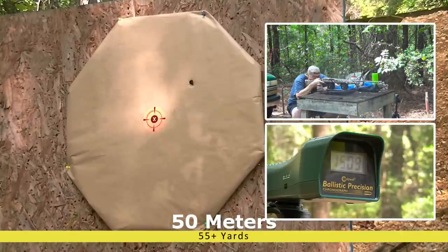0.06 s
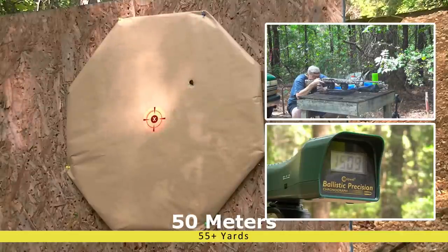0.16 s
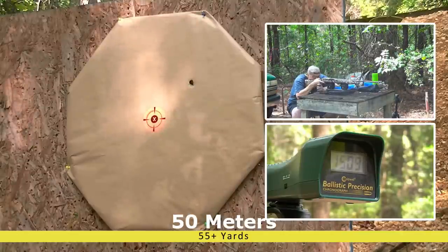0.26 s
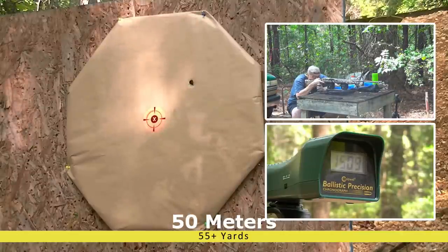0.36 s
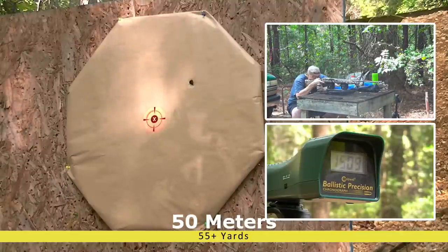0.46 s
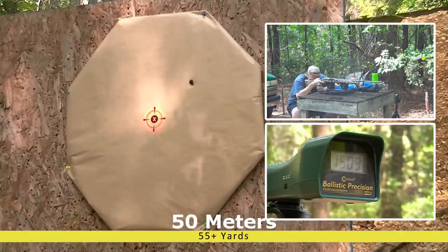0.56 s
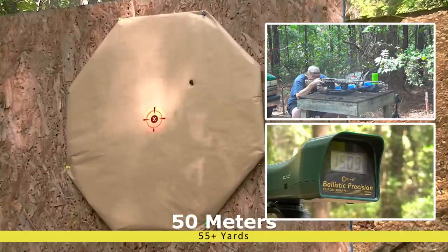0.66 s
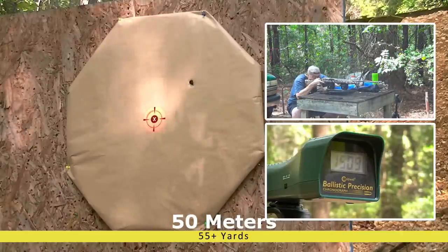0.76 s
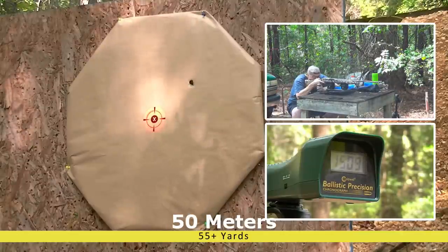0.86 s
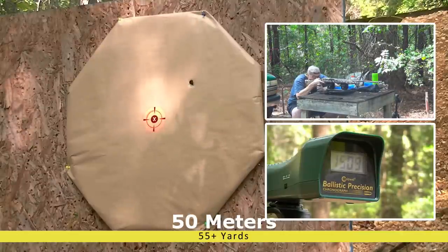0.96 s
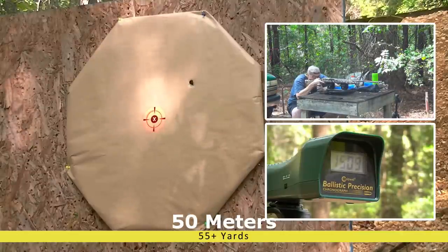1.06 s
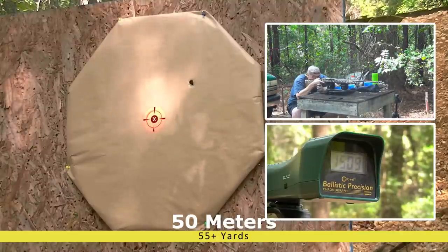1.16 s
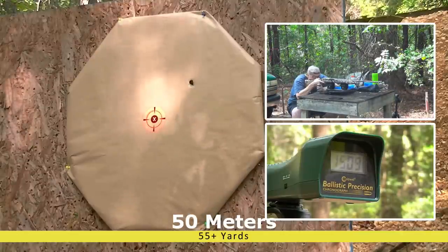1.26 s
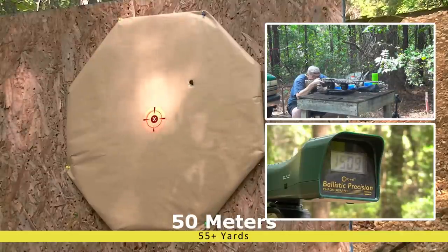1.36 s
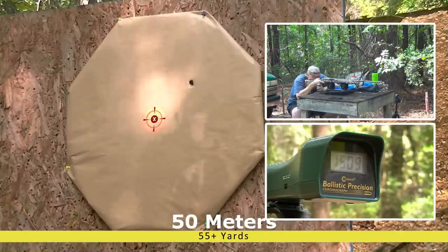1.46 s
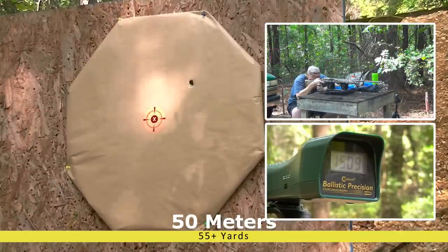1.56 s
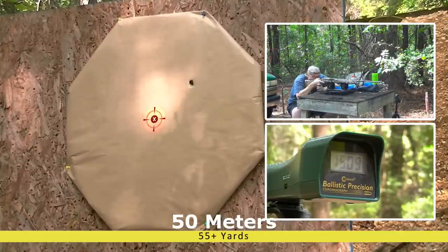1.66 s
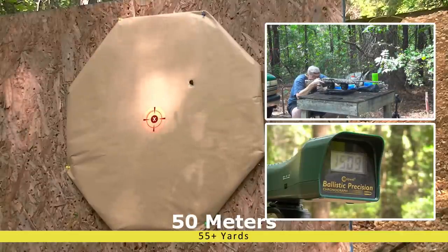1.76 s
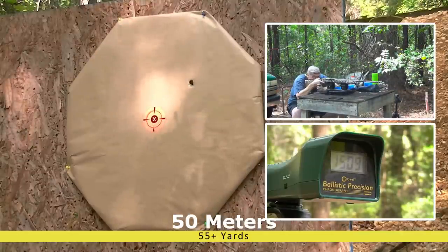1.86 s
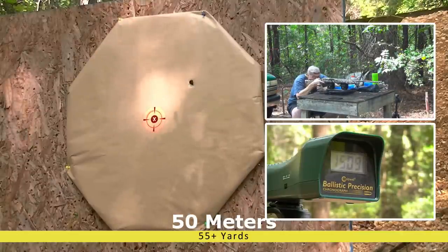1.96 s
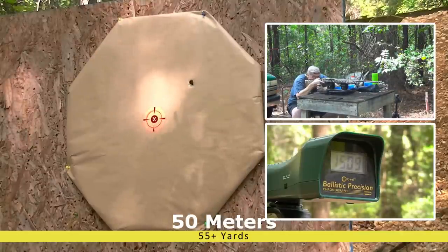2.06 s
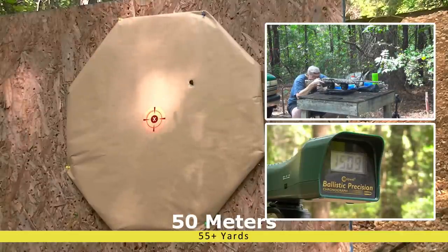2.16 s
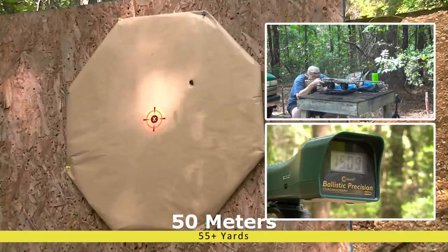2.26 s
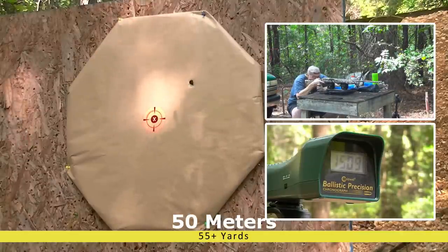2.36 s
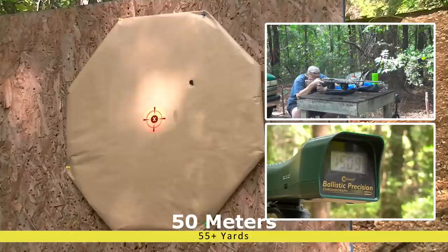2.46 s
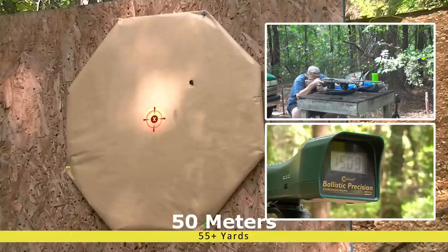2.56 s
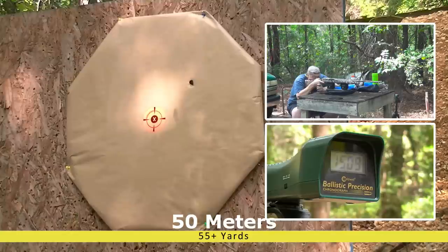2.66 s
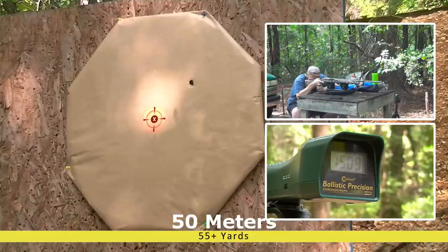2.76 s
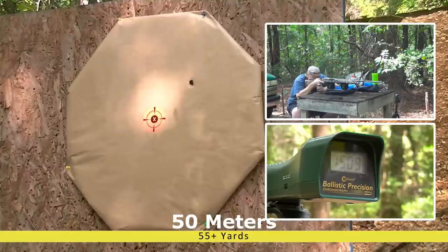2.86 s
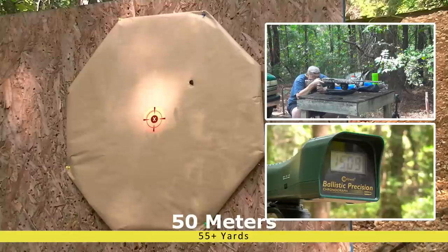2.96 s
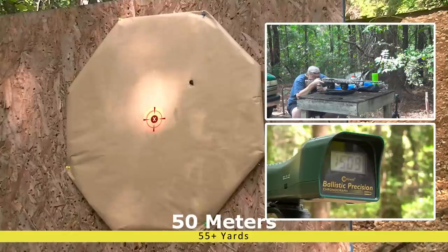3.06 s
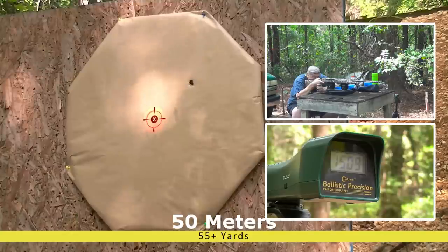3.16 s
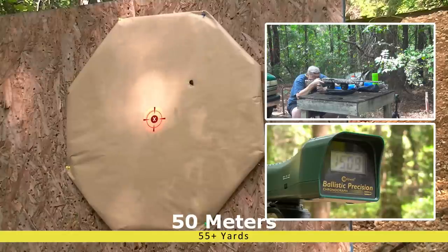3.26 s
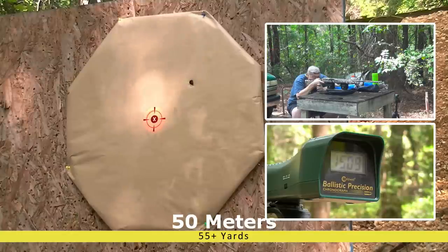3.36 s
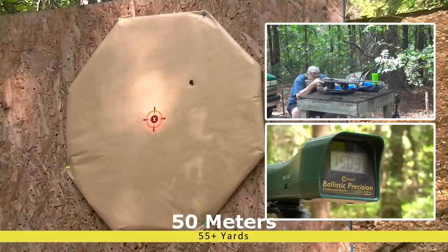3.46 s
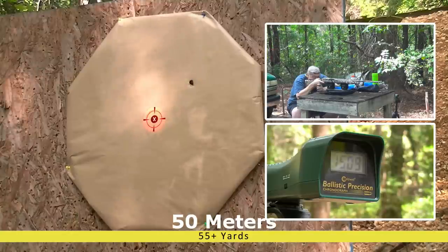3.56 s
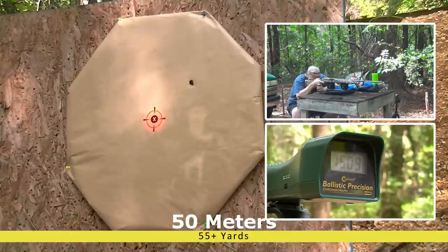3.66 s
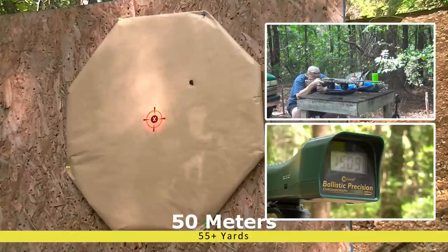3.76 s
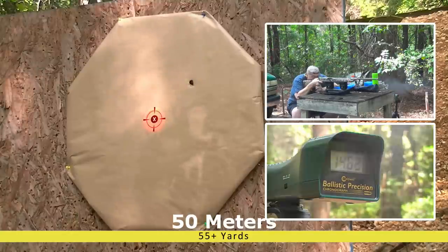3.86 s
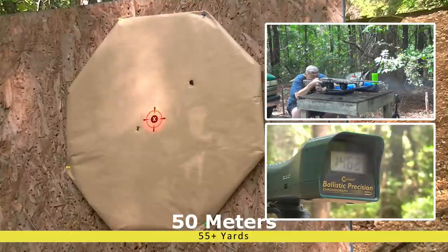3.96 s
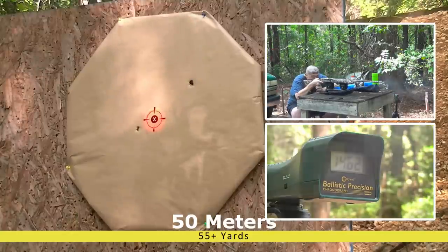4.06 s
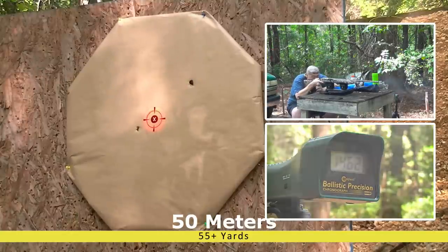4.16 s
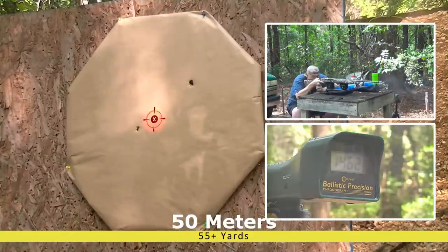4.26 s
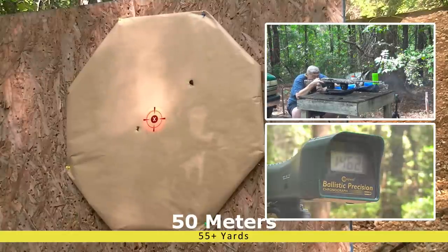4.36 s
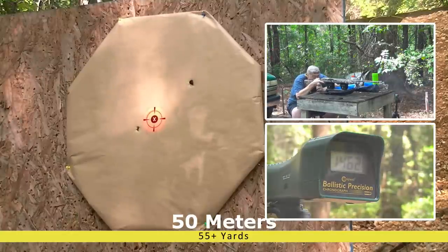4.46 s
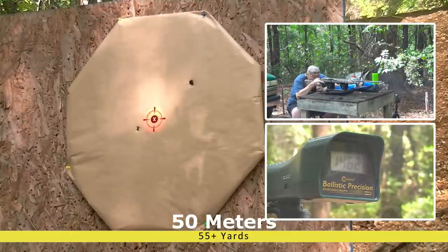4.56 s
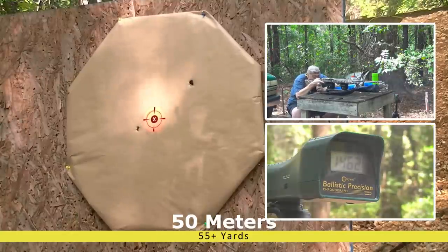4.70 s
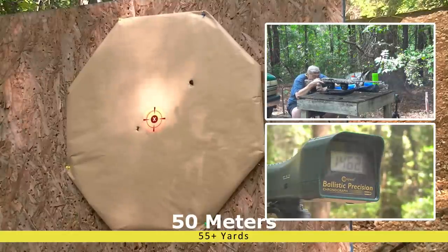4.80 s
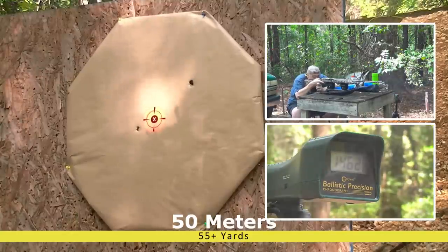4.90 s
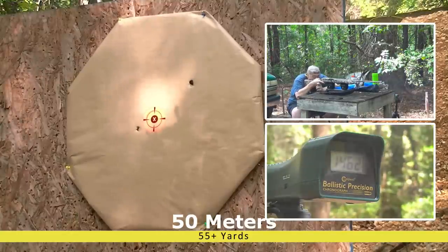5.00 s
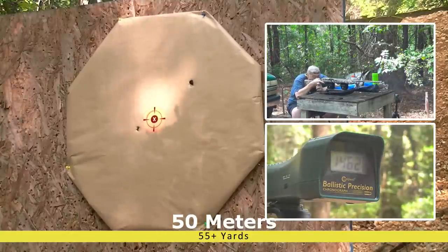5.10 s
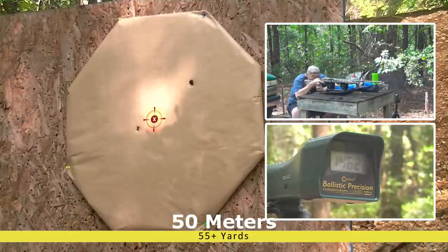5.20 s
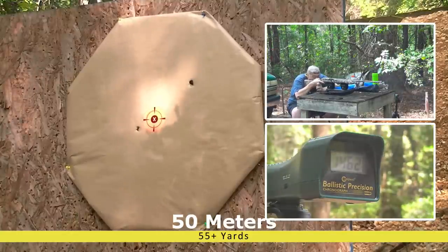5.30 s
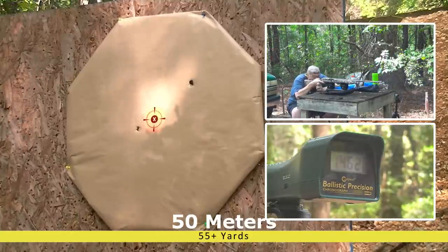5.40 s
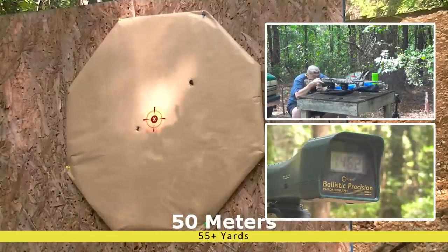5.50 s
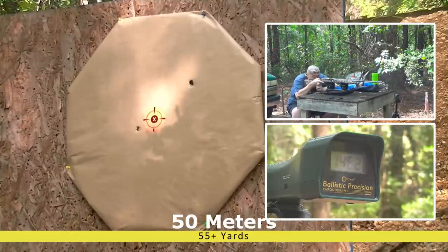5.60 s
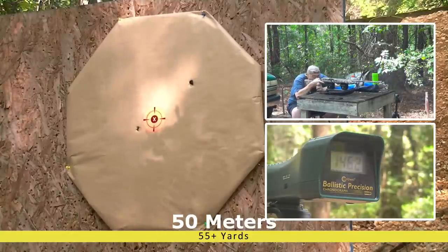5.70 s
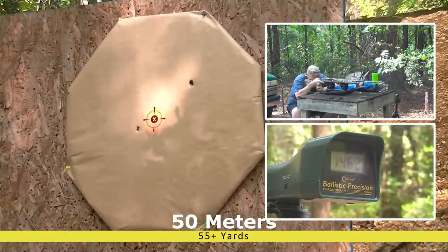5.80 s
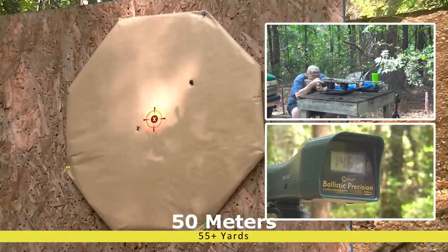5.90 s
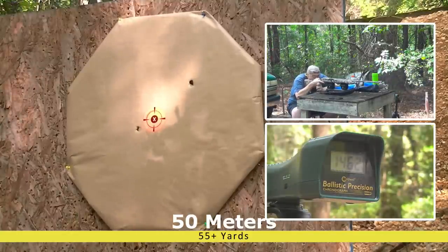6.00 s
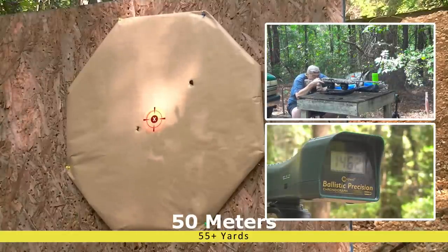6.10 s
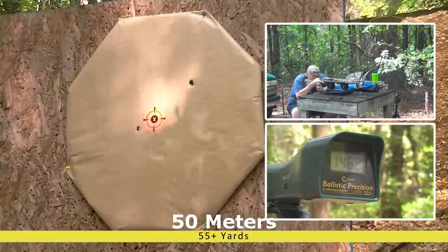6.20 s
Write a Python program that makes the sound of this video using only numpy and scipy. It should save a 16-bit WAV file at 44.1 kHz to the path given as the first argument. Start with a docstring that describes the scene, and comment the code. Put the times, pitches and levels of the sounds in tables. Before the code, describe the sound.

A single loud shotgun blast rolls away through the woods, after faint clothing rustles over a quiet outdoor hush.

```python
"""Clothes rustle and gear ticks over a quiet hush of leaves, traffic and a far engine at a woodland range.
Then a shotgun fires from a bench a few metres away: the action snaps, gas bursts from the muzzle, and the
shock reflects off the ground. Near trunks scatter the blast as a crackle, far ones as a darkening roll.
The blast overloads the microphone; a limiter holds the first half second of the roar level, and a slow
gain control leaves the background ducked."""
import sys
import numpy as np
from scipy import signal
from scipy.fft import rfft, irfft
from scipy.io import wavfile
from scipy.ndimage import uniform_filter1d

SR = 44100
rng = np.random.default_rng(int(sys.argv[2]) if len(sys.argv) > 2 else 0)


def master(y):
    """Save y as 16-bit WAV."""
    cut = np.clip(np.atleast_2d(y).T, -1, 1)
    pcm = np.round(cut * 32767)  # scale
    wavfile.write(sys.argv[1], SR, pcm.astype(np.int16))


N = 275184
T = np.arange(N) / SR
SNAP_S, BLAST_S = 3.8516, 3.8578
BLAST_AGE_S = np.maximum(T - BLAST_S, 0)

# Relative spectral densities of the blast, its near echoes and its far echoes: frequency_hz, level_db
BLAST_SPECTRUM = [(40, -26.5), (150, -10.5), (400, 3.5), (900, -2.5), (1600, 1.5), (3000, -2), (4500, -6.5),
                  (7000, -4), (9500, 0.5), (12500, -3.5), (16000, -11)]
NEAR_SPECTRUM = [(24, -57.5), (40, -27), (174, -4.5), (333, -4.5), (387, -9), (637, -6), (722, -10.5),
                 (881, -4), (1100, -1.5), (1910, -6), (2160, -5.5), (2570, -9.5), (11200, -19),
                 (15500, -33.5)]
WOODS_SPECTRUM = [(35, -54), (60, -29.5), (151, -23), (195, -21), (309, -16), (469, -7.5), (605, -3.5),
                  (648, -4.5), (711, -1.5), (1080, 0), (1670, -7.5), (3840, -14.5), (7000, -29),
                  (9900, -31), (15000, -50.5)]
# Extra loss to air and foliage along the path, negative for a gain: frequency_hz, loss_db_per_s
PATH_LOSS = [(100, 4.5), (300, -4.5), (700, -2), (1200, 1), (2000, 4.5), (3500, 18.5), (6000, 32),
             (9000, 49), (14000, 70.5)]
# Dense stands of trees that reflect more than the rest: arrival_s, half_width_s, boost_db
TREE_STANDS = [(4.04, 0.042, 2), (4.28, 0.054, 4.5), (4.86, .03, 2)]
# Level difference for sound from the right, mainly in the midrange: frequency_hz, left_minus_right_db
RIGHT_LEAN = [(100, 0), (350, -1), (850, -4), (1700, -4.5), (3000, -1), (4300, -2), (8000, -.4), (13000, 0)]
# Strokes of cloth: middle_s, half_length_s, level_db, tilt_db_per_octave
CLOTH_STROKES = [(0.401, .07, -52.5, 0.5), (.555, 0.035, -59, -0.5), (0.874, 0.063, -52.5, 0),
                 (0.939, 0.1, -51.5, -2), (1.02, 0.11, -54.5, -3), (2.499, 0.12, -52.5, -2),
                 (2.565, 0.052, -55, -1.5), (2.865, .07, -51.5, 0), (2.913, 0.09, -48, -0.5),
                 (5.153, .11, -51.5, 3), (5.23, .09, -52.5, 7), (5.368, 0.13, -54, 5),
                 (5.489, 0.14, -55, 5), (5.718, 0.23, -64, 13), (6.167, 0.2, -59, 3)]
# Relative spectral density of sliding cloth: frequency_hz, level_db
CLOTH_SPECTRUM = [(300, -11), (1000, -1.5), (2400, 1.5), (3800, -4), (5000, -4.5), (7000, -4.5),
                  (10500, -4.5), (13000, -6.5), (16000, -29)]
# Ticks and knocks of gun and gear: start_s, level_db, centre_hz, half_width_octaves, t60_s
GEAR_CONTACTS = [(.4, -41.5, 900, 0.81, .017), (.555, -51, 1680, .4, .054), (.945, -44.5, 2200, .6, .027),
                 (1.023, -43, 800, .8, 0.014), (1.2257, -44, 11000, .3, .006), (1.232, -44, 350, .5, .023),
                 (1.2836, -45, 10000, .5, .004), (1.3762, -49, 6500, .25, .007),
                 (2.6255, -47, 9000, .9, .008), (2.865, -46.5, 1100, .18, .057),
                 (2.918, -45, 2400, .3, .06), (2.948, -42, 2200, 0.6, .012),
                 (3.0338, -44, 6500, 0.36, .008), (3.1278, -43.5, 7000, 0.76, .006),
                 (4.4614, -31.5, 14000, 0.27, .04), (4.9366, -33, 13500, .6, 0.056),
                 (5.4758, -40, 6500, .7, .011), (5.6862, -36, 12450, 0.4, 0.0059),
                 (6.174, -45, 13000, .4, .006), (6.213, -47, 7000, .9, .03)]
# Relative spectral density of leaves and distant traffic: frequency_hz, level_db
HUSH_SPECTRUM = [(15, -37), (25, -20.5), (48, -4.5), (126, -7.5), (267, -9.5), (368, -8.5), (399, -8),
                 (469, -6.5), (552, -8.5), (598, -8), (848, -10), (1270, -14), (3720, -17.5), (9810, -25.5),
                 (15500, -28.5)]
# Partials of a far engine: pitch_hz, level_db, swell_db
ENGINE_PARTIALS = [(57.4, -65, 1), (86, -74, 4), (122, -70, 9)]
# Likeness of the two microphone signals, for the echoes and for the other noises.
# Two lists each: frequency_hz, coherence; frequency_hz, left_lead_rad
ECHO_PAIR = ([(100, .98), (350, .92), (800, .7), (1500, .48), (2400, .35), (3200, .68), (7000, .58),
             (10000, .92), (12500, .995)], [(100, .2), (400, .42), (800, .55), (1500, .6), (2400, 0),
             (3200, -.25), (6000, 0), (13000, 0)])
PLAIN_PAIR = ([(100, .98), (500, .88), (1300, .7), (5000, .77), (9000, .9), (12500, .995)], [(100, .05),
              (1000, .22), (3000, .05), (13000, 0)])


def muzzle_blast(snap_db=-12, jet_db=4.5, jet_hold_s=0.0048, jet_t60_s=0.0099):
    """Turbulent expansion: just after the action snaps, gas tears out for a few milliseconds."""
    noise = stereo_noise(lambda hz: curve_at(BLAST_SPECTRUM, hz), PLAIN_PAIR)
    snap = burst(SNAP_S, rise_s=0.0003, t60_s=0.01)
    jet = (T > BLAST_S) * decay(np.maximum(BLAST_AGE_S - jet_hold_s, 0), jet_t60_s)
    return noise * (gain_of(snap_db) * snap + gain_of(jet_db) * jet)


def ground_shock(delay_s=0.0077, overpressure_s=0.00065):
    """Reflection: the shock returns from the ground as a blast wave, overpressure and then suction."""
    scaled_age = np.maximum(BLAST_AGE_S - delay_s, 0) / overpressure_s
    pressure = (scaled_age > 0) * (1 - scaled_age) * np.exp(-scaled_age)
    return highpass(pressure, cutoff_hz=160, order=2)  # the microphone sheds deep bass


def near_echoes(level_db=2):
    """Scattering: bench, ground and the nearest trunks return the blast as a bright, full crackle."""
    grain = flutter(depth_db=4, samples=12) * flutter(depth_db=1, samples=300)
    crackle = stereo_noise(lambda hz: curve_at(NEAR_SPECTRUM, hz), ECHO_PAIR, grain=grain)
    return gain_of(level_db) * crackle * burst(BLAST_S, rise_s=0.0029, t60_s=0.84)


def woods_echoes(build_s=0.071, reference_s=4.26):
    """Absorption: the later an echo from the far trunks, the more treble its path has cost it."""
    grain = flutter(depth_db=2, samples=20) * flutter(depth_db=0.52, samples=700)
    roar = stereo_noise(lambda hz: curve_at(WOODS_SPECTRUM, hz), ECHO_PAIR, grain=grain)
    hz, frame_s, spectra = signal.stft(roar, SR, nperseg=512)
    extra_path_s = np.maximum(frame_s, BLAST_S) - reference_s  # zero where WOODS_SPECTRUM holds as is
    loss_db = curve_at(PATH_LOSS, hz)[:, None] * extra_path_s
    echoes = signal.istft(spectra * gain_of(-loss_db), SR, nperseg=512)[1][:, :N]
    return echoes * roll_envelope() * np.minimum(BLAST_AGE_S / build_s, 1)


def roll_envelope(level_db=-6, hold_s=0.55, fall_db_per_decade=61.5):
    """Power-law decay: the roll holds across the nearer trees, then falls; each dense stand lifts it."""
    fall_db = fall_db_per_decade * np.log10(1 + (BLAST_AGE_S / hold_s) ** 6) / 6
    stands_db = sum(boost_db * swell(arrival_s, width_s) for arrival_s, width_s, boost_db in TREE_STANDS)
    return gain_of(level_db - fall_db + stands_db)


def lean_right(echoes, early_share=1.9, late_share=0.12, build_s=0.015, fade_s=0.48):
    """Diffusion: early echoes come from the right, later ones from all round."""
    hz, frame_s, spectra = signal.stft(echoes, SR, nperseg=512)
    age_s = np.maximum(frame_s - BLAST_S, 0)
    share = late_share + early_share * (1 - np.exp(-age_s / build_s)) * np.exp(-age_s / fade_s)
    side_db = curve_at(RIGHT_LEAN, hz)[:, None] * share
    return signal.istft(spectra * gain_of([side_db / 2, -side_db / 2]), SR, nperseg=512)[1][:, :N]


def cloth_rustles():
    """Friction: cloth slides in short strokes, each a swell of tiny catches."""
    out = np.zeros((2, N))
    for middle_s, half_length_s, level_db, tilt in CLOTH_STROKES:
        count = round(2 * half_length_s * SR)
        catches = flutter(depth_db=3.5, samples=30, count=count)
        stroke = stereo_noise(lambda hz: curve_at(CLOTH_SPECTRUM, hz) + tilt * np.log2(hz + 1),
                              PLAIN_PAIR, count, catches)
        mix_in(out, middle_s - half_length_s, gain_of(level_db) * stroke * np.hanning(count) ** 2)
    return out


def gear_ticks(count=4096):
    """Damped resonance: each small hard contact rings briefly in one broad band."""
    out = np.zeros((2, N))
    age_s = np.arange(count) / SR
    for start_s, level_db, centre_hz, octaves, t60_s in GEAR_CONTACTS:
        ring = stereo_noise(lambda hz: -20 * np.log10(1 + (np.log2((hz + 1) / centre_hz) / octaves) ** 2),
                            PLAIN_PAIR, count)
        mix_in(out, start_s, gain_of(level_db) * ring * decay(age_s, t60_s))
    return out


def outdoor_hush(level_db=-53):
    """Incoherent addition: leaves and distant traffic merge into a nearly steady noise."""
    hush = stereo_noise(lambda hz: curve_at(HUSH_SPECTRUM, hz), PLAIN_PAIR)
    return gain_of(level_db) * hush * flutter(depth_db=0.54, samples=8000)


def far_engine():
    """Periodic vibration: low partials waver with the engine's speed and swell once before the shot."""
    out = np.zeros(N)
    speed = flutter(depth_db=0.16, samples=2500)
    run_s = np.cumsum(speed) / SR
    surge = swell(middle_s=3.25, half_width_s=0.46)
    for pitch_hz, level_db, swell_db in ENGINE_PARTIALS:
        partial = np.sin(2 * np.pi * pitch_hz * run_s) * flutter(depth_db=2.5, samples=2500)
        out += gain_of(level_db + swell_db * surge) * unit_rms(partial)
    return out


def stereo_noise(spectrum_db, pair, count=N, grain=1):
    """Partial coherence: two microphones share part of a coloured noise, scaled to rms 1."""
    hz = np.fft.rfftfreq(count, 1 / SR)
    common, separate = rfft(rng.standard_normal((2, count)) * grain)
    coherence, lead_rad = (curve_at(table, hz) for table in pair)
    left = common * np.exp(1j * lead_rad)
    right = coherence * common + np.sqrt(1 - coherence ** 2) * separate
    return unit_rms(irfft(np.array([left, right]) * gain_of(spectrum_db(hz)), count))


def flutter(depth_db, samples, count=N):
    """Random modulation: a gain that drifts over about the given number of samples."""
    return gain_of(depth_db * unit_rms(uniform_filter1d(rng.standard_normal(count), samples)))


def burst(start_s, rise_s, t60_s):
    """Transient envelope: a quick rise, then exponential decay."""
    age_s = np.maximum(T - start_s, 0)
    return (1 - np.exp(-age_s / rise_s)) * decay(age_s, t60_s)


def decay(age_s, t60_s):
    """Exponential damping: 60 dB down after t60_s."""
    return np.exp(-np.log(1000) * age_s / t60_s)


def swell(middle_s, half_width_s):
    """Bell curve of height 1."""
    return np.exp(-((T - middle_s) / half_width_s) ** 2)


def gain_of(db):
    """Decibels as an amplitude ratio."""
    return 10 ** (np.asarray(db) / 20)


def unit_rms(x):
    """Normalisation to rms 1."""
    return x / np.sqrt(np.mean(x ** 2) + 1e-20)


def curve_at(table, hz):
    """Interpolation on a log-frequency axis."""
    table_hz, values = np.transpose(table)
    return np.interp(np.log(hz + 1), np.log(table_hz + 1), values)


def mix_in(mix, start_s, sound):
    """Superposition of a stereo sound from start_s on."""
    part = mix[:, round(start_s * SR):][:, :sound.shape[1]]
    part += sound[:, :part.shape[1]]


def highpass(x, cutoff_hz, order):
    """Bass roll-off of 6 dB per octave for each order."""
    return signal.sosfilt(signal.butter(order, cutoff_hz, "highpass", fs=SR, output="sos"), x)


def smooth(x, lag_s):
    """Exponential averaging by a one-pole lag."""
    pole = np.exp(-1 / (lag_s * SR))
    return signal.lfilter([1 - pole], [1, -pole], x)


def peak_hold(db, release_db_per_s):
    """Peak detection: follows each rise at once and lets go at a steady rate."""
    return np.maximum.accumulate(db + release_db_per_s * T) - release_db_per_s * T


def scene():
    """Superposition: the shot and its echoes over the small sounds of the quiet range."""
    shot = muzzle_blast() + ground_shock()
    echoes = lean_right(near_echoes() + woods_echoes())
    background = outdoor_hush() + far_engine()
    return shot + echoes + cloth_rustles() + gear_ticks() + background


def record(dry, limit_db=-14, max_duck_db=9, ceiling=0.52, low_cut_hz=45, high_cut_hz=15900):
    """Compression and saturation: what outruns a limiter and a slow gain control clips, then is filtered."""
    power_db = 10 * np.log10(smooth((dry ** 2).mean(0), lag_s=0.0099) + 1e-12)
    excess_db = np.maximum(power_db - limit_db, 0)
    limiter_db = peak_hold(excess_db, release_db_per_s=76.5)
    duck_db = peak_hold(np.minimum(excess_db, max_duck_db), release_db_per_s=2.5)
    cut_db = smooth(np.maximum(limiter_db, duck_db), lag_s=0.0011)
    limited = dry * gain_of(-cut_db)
    clipped = limited / (1 + (limited / ceiling) ** 8) ** (1 / 8)
    lowpass = signal.firwin(511, high_cut_hz, window=("kaiser", 9), fs=SR)
    return signal.oaconvolve(highpass(clipped, low_cut_hz, order=1), lowpass[None], "same")


dry = scene()
out = record(dry)
master(out)
```